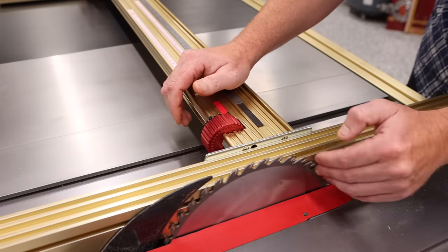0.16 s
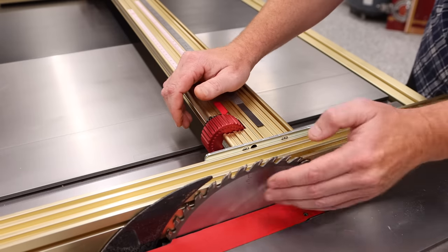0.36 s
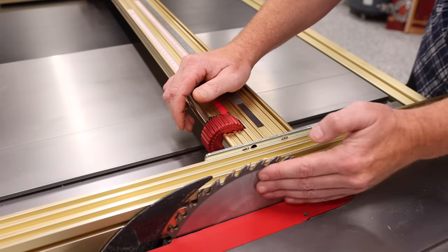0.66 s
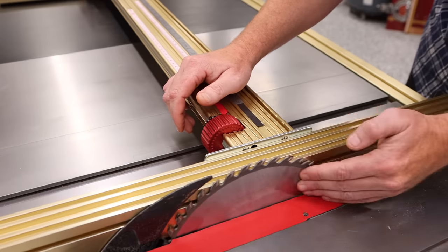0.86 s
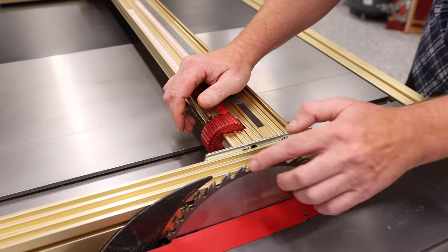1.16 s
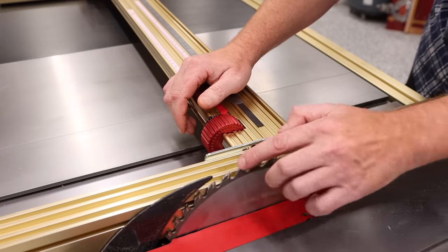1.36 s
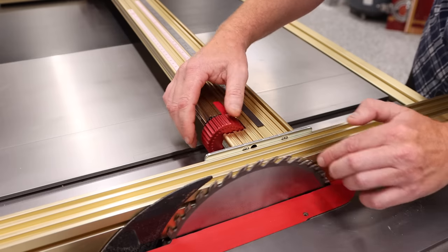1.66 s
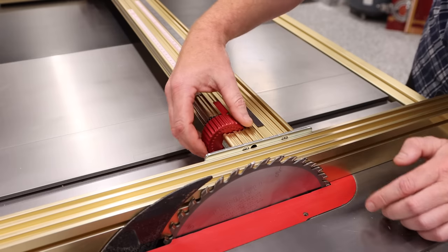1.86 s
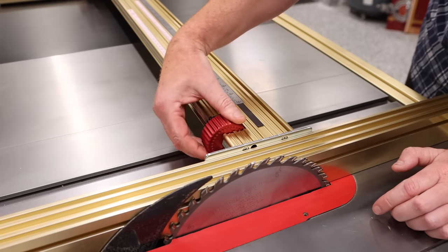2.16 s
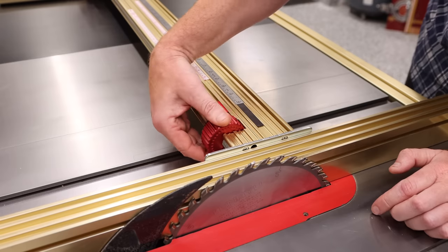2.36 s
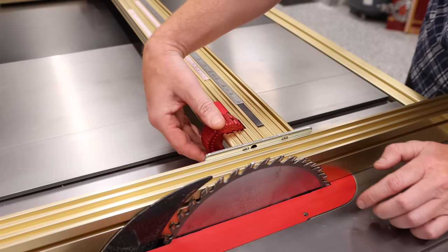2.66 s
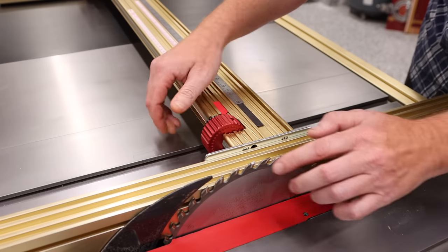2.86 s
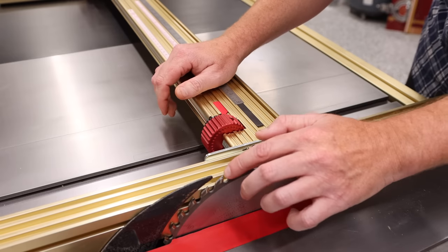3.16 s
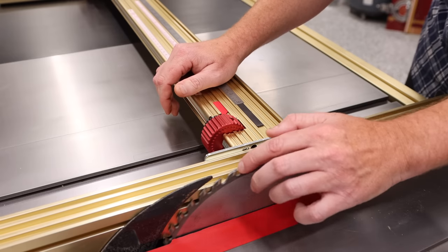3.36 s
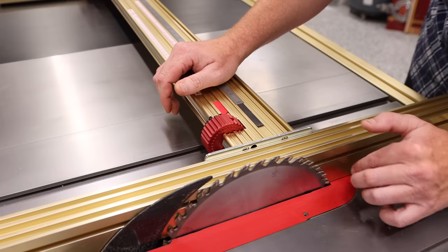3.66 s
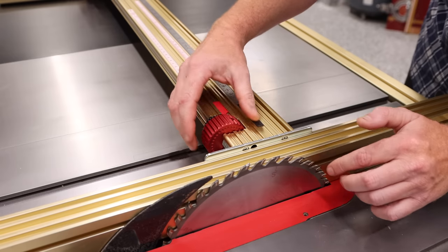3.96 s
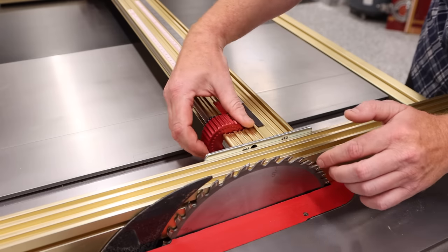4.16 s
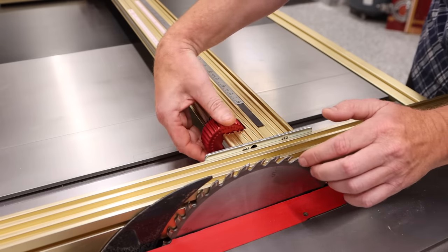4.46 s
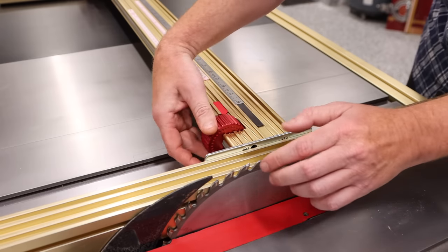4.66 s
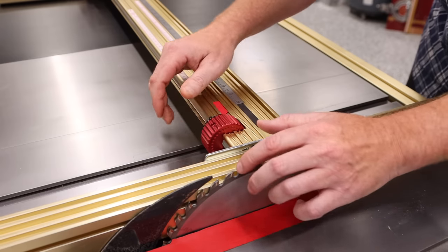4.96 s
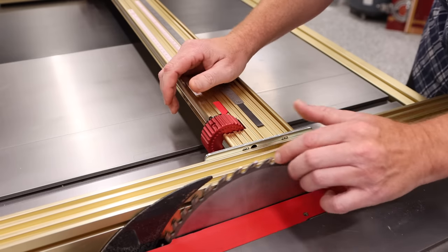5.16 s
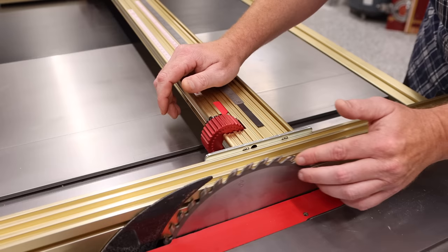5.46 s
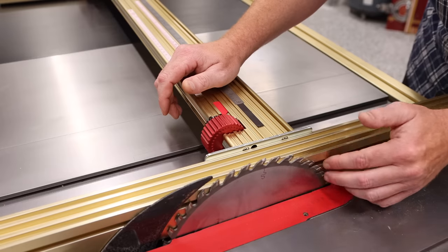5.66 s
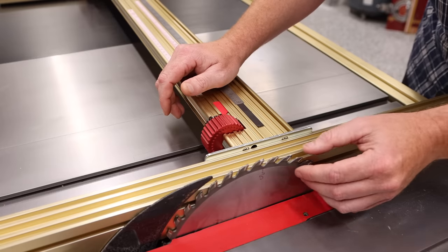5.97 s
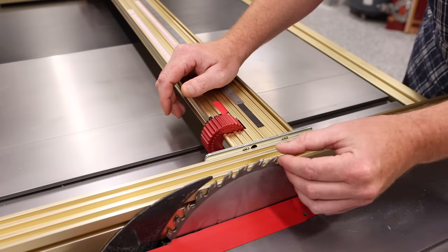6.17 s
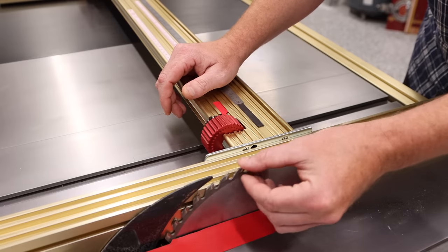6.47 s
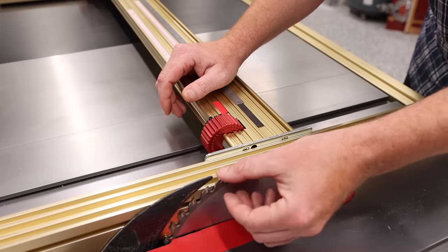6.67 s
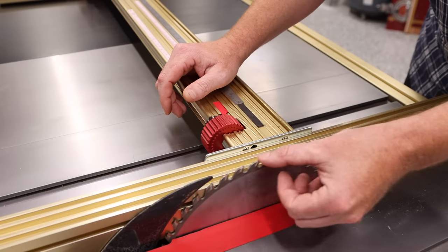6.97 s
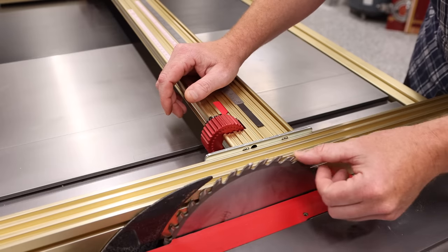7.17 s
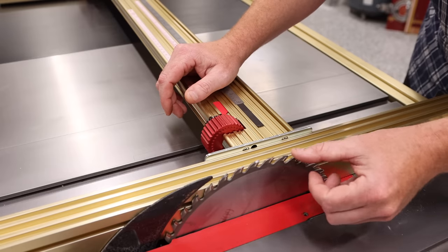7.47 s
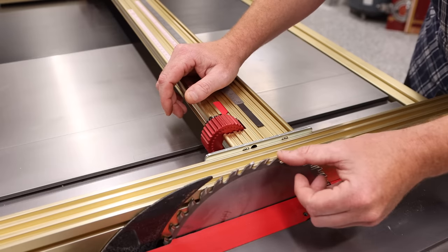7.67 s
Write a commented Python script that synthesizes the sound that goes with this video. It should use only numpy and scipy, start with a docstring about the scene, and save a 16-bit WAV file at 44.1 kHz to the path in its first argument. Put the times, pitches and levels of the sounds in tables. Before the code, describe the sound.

A close microphone picks up hands on a table saw that is switched off. Quiet taps and dry brushing lead to a rapid run of five hard, metallic knob clicks, a single knock, a few light ticks, and another five-click run. Afterwards carbide teeth catch and scrape on hollow aluminium, with short hollow, ringing squeaks in uneven groups. The room is almost echo-free, with slight low background noise and hiss.

```python
"""Fingertips tap and brush an aluminium saw fence: short resonant ticks and shaped friction noise.
A knurled knob is then turned through five detents, twice: noise snaps, decaying modes and screw friction.
After more touches, a saw blade is rocked by hand: its teeth scrape the fence, uneven noise feeding resonances.
Throughout, coloured noise gives a low background rumble, rising with the handling sounds, and a faint hiss."""
import sys
import numpy as np
from scipy import signal
from scipy.fft import rfft, irfft
from scipy.io import wavfile
from scipy.ndimage import uniform_filter1d

SR = 44100
rng = np.random.default_rng(int(sys.argv[2]) if len(sys.argv) > 2 else 0)


def generate_wav(sig):
    """Save sig (samples, or channels by samples) to the path in sys.argv[1] as 16-bit PCM at SR."""
    pcm = np.round(np.clip(np.atleast_2d(sig).T, -1, 1) * 32767).astype(np.int16)
    wavfile.write(sys.argv[1], SR, pcm)


N = 344807


def undb(db):
    """Amplitude ratio: decibels to gain."""
    return 10 ** (np.asarray(db) / 20)


def unit(x):
    """Power normalisation: scale to rms 1."""
    return x / np.sqrt(np.mean(x ** 2))


def colour(x, points):
    """Spectral shaping: (Hz, dB) points joined on a log frequency axis; rms 1."""
    hz, db = np.transpose(points)
    bins_hz = np.arange(len(x) // 2 + 1) * SR / len(x)
    log_f = np.log(bins_hz + 0.0014)  # the offset avoids log(0)
    gain = undb(np.interp(log_f, np.log(hz), db, left=-90, right=-90))
    return unit(irfft(rfft(x) * gain, len(x)))


def resonate(x, hz, width):
    """Simple resonance: a two-pole filter with gain 1 at its centre."""
    return signal.lfilter(*signal.iirpeak(hz, hz / width, fs=SR), x)


def band(x, hz, width):
    """Cascaded resonance: two equal resonators in series; rms 1."""
    return unit(resonate(resonate(x, hz, width), hz, width))


def walk(rate):
    """Random modulation: levels held 1 / rate s and slewed twice; spread near 1."""
    k = int(SR / rate)
    steps = np.repeat(rng.standard_normal(N // k + 1), k)
    return 0.89 * uniform_filter1d(uniform_filter1d(steps, k), k)[:N]


def decay(t, rise, t60):
    """Exponential damping: a quick build-up, then a fall of 60 dB per t60."""
    return (1 - np.exp(-t / rise)) * np.exp(-np.log(1000) * t / t60)


def add(out, s, x):
    """Superposition: mix x into out from time s."""
    i = int(s * SR)
    out[i:i + len(x)] += x[:len(out) - i]


# detent clicks: (time [s], level [dB], low ring in the rail [dB], top [dB])
DETENTS = [(2.248, -22.5, 2, -4.5), (2.314, -23, -3.5, -4), (2.38, -22, -5.5, 6.8), (2.45, -24, -1.3, 0),
           (2.521, -22, -7.5, 4), (4.34, -22.5, -2, -0.1), (4.402, -21.5, -9, -0.5), (4.472, -22, -5, 6),
           (4.557, -29.5, 0.5, -8), (4.631, -22.5, -4, -11)]
# modes of the knob: (frequency [Hz], level [dB], t60 before the 65 ms cap [s])
KNOB_MODES = [(1198, -12, 0.092), (1458, -4.5, .05), (2074, -7.5, 0.046), (2263, -9.5, 0.068),
              (3270, -9.5, .045), (3693, 4, 0.037), (4160, -5.5, 0.064), (5000, -3, 0.025),
              (5050, -6.5, .045), (5330, 0.5, 0.054), (5400, -4, 0.032), (6780, -3, 0.039),
              (8000, 0.5, 0.023)]
# spectrum of the snap: (frequency [Hz], density [dB per Hz])
SNAP_SPECTRUM = [(18, -51), (30, -19), (858, -21.5), (1180, -13.5), (1800, -13), (2220, -8.5), (3660, -1.5),
                 (4650, -4), (5300, 0), (13000, -17.5), (14500, -14), (16500, -37.5)]
KNOB_RING_DB = 2  # lift of the knob's modes near 2.2 kHz


def detents():
    """Impact excitation: a ball drops into a groove, giving a snap, the knob's modes and a thud in the rail."""
    out, t = np.zeros(N), np.arange(8192) / SR
    hz, mode_db, t60 = np.transpose(KNOB_MODES)[:, :, None]
    t60 = np.minimum(t60, .065)  # no mode rings longer than 65 ms
    high_pass = signal.butter(2, 7000, "high", fs=SR, output="sos")
    low_pass = signal.butter(2, 1600, fs=SR, output="sos")
    for s, db, low_db, top_db in DETENTS:
        luck_db, detune, phase = rng.standard_normal((3, len(KNOB_MODES), 1))
        # each groove strikes the modes in other proportions
        mode_gain = undb(mode_db + 4 * luck_db + low_db * (hz < 1600)
                         + KNOB_RING_DB * (abs(hz - 2200) < 500))
        tones = np.sin(2 * np.pi * (hz * (1 + 0.0046 * detune) * t + phase))
        rings = np.sum(mode_gain * tones * decay(t, 0.00092, t60), axis=0)
        snap = colour(rng.standard_normal(len(t)), SNAP_SPECTRUM)
        top = signal.sosfilt(high_pass, snap)
        thud = signal.sosfilt(low_pass, snap)
        click = snap * (decay(t, 0.0033, 0.038) + undb(-16.0) * decay(t, 0.01, 0.094))
        click += undb(top_db) * top * decay(t, 0.00052, 0.01)
        click += undb(low_db) * thud * decay(t, 0.0059, 0.11)
        click += undb(-9.0) * rings
        add(out, s, undb(db) * click)
    return out


# strokes of the teeth: (time [s], rise [s], hold [s], level [dB], deep mode [Hz], deep mode level [dB],
# blade ring [dB])
SCRAPES = [(5.501, .0032, 0.026, -37.5, 563, 4, -6), (5.542, 0.022, 0.031, -39.5, 850, 10, 9),
           (5.606, 0.022, 0.037, -39.5, 352, 14.5, 14), (5.711, 0.017, 0.057, -58, 363, 3, 12),
           (6.361, 0.031, 0.038, -47, 566.5, 19.5, 12), (6.514, 0.0047, .012, -42, 577, -15, 16),
           (6.588, 0.029, 0.021, -46, 350, 15.5, 23), (6.937, 0.017, 0.016, -43, 830, 2, 20),
           (7.025, 0.011, 0.002, -40, 840, -10, 16), (7.102, 0.019, 0.0051, -39, 340, 6.5, 12),
           (7.177, 0.0055, 0.012, -47.5, 360, -4, 3), (7.33, 0.038, 0.0033, -64, 316, 17, 8),
           (7.681, .028, 0.033, -60.5, 364, 1, 11), (7.742, .082, .05, -45.5, 355, 15.5, 17)]
# modes of the fence, with the blade's at 2.3-2.7 kHz; taps() rings them too:
# (frequency [Hz], nominal width [Hz], level [dB])
FENCE_MODES = [(1275, 190, -15.5), (1522, 14.3, -8), (1995, 36, -2.5), (2163, 7.3, -10), (2486, 5.9, -0.5),
               (2995, 28, -3), (3648, 75, 5.5), (3885, 120, -5.5), (4230, 33, 0), (4990, 13, -8),
               (5660, 29, -14), (5614, 32, -13), (7430, 53, -10), (8170, 15, -26.5), (9460, 27, -19.5),
               (10800, 54, -20), (13870, 69, -14.5), (15500, 69, -30)]
# spectrum of the grit under the teeth: (frequency [Hz], density [dB per Hz])
GRIT_SPECTRUM = [(240, -20), (400, -14.5), (1050, -20.5), (1210, -13.5), (1700, -15.5), (3700, -7),
                 (6900, -28), (7820, -10), (12700, -48), (14800, -22), (16500, -72)]
FADE_T60_S, FADE_PER_LENGTH = .06, 1.64  # longer strokes let go more slowly
BRIGHT_DB, BLADE_WIDTH_HZ = 10.5, 32  # lift of bright fence modes; the blade rings more cleanly
MIDDLE_DB, MIDDLE_PER_DEEP = 7.5, 0.83  # modes under 1.7 kHz grow with the deep one
HAND_DAMPING = .018  # a hand on the blade: least width of the other modes, as a share of frequency


def scrapes():
    """Friction excitation: carbide teeth slip unevenly on aluminium, ringing the hollow fence and blade."""
    out, t = np.zeros(N), np.arange(16384) / SR
    chatter = undb(walk(900) + 2.8 * walk(90))
    wander = undb(0.83 * walk(40))  # the contact point creeps during a stroke
    for s, rise, hold, db, deep_hz, deep_db, blade_db in SCRAPES:
        fade_t60 = FADE_T60_S + FADE_PER_LENGTH * (rise + hold)
        fade = np.exp(-np.log(1000) * np.clip(t - rise - hold, 0, None) / fade_t60)
        push = np.clip(t / rise, 0, 1) ** 0.67 * fade
        slips = rng.standard_normal(len(t)) * np.resize(chatter[int(s * SR):], len(t))
        stroke = undb(-7) * push * colour(slips, GRIT_SPECTRUM)
        stroke += undb(deep_db) * resonate(slips * push, deep_hz, 15.5)
        # each tooth meets the fence elsewhere, so the modes are fed in other proportions
        for hz, width, mode_db in FENCE_MODES:
            luck_db, place = rng.standard_normal(2) * [1.8, 1]
            width = max(width, HAND_DAMPING * hz)
            share_db = BRIGHT_DB
            if hz < 1700:
                share_db = MIDDLE_DB + MIDDLE_PER_DEEP * deep_db
            elif 2300 < hz < 2700:
                share_db, width = blade_db, BLADE_WIDTH_HZ
            creep = np.roll(wander, int(9999 * place))[:len(t)]
            ring = resonate(slips * push * creep, hz * (1 + 0.0037 * place), width)
            stroke += undb(mode_db + share_db + luck_db) * ring
        add(out, s, undb(db) * stroke)
    return out


# finger and tooth taps, hand thumps: (time [s], level [dB], centre [Hz], nominal t60 [s])
TAPS = [(.115, -57, 3700, 0.022), (0.116, -41.5, 292, 0.041), (0.193, -58, 1150, 0.015),
        (0.222, -65, 3760, 0.12), (.54, -61.5, 684, 0.024), (0.85, -40, 143, 0.097),
        (.855, -55, 2700, 0.015), (1.185, -60, 487, 0.04), (1.659, -51.5, 650, 0.029),
        (1.724, -58, 3100, 0.075), (1.734, -39.5, 130, 0.13), (1.743, -58.5, 3440, 0.097),
        (2.62, -49.5, 870, 0.0087), (2.973, -29.5, 2030, 0.0053), (2.978, -47, 394, 0.051),
        (3.655, -50.5, 4900, 0.011), (3.713, -50.5, 4000, 0.099), (3.712, -45.5, 2400, 0.078),
        (3.72, -52, 438, 0.056), (5.254, -63, 6580, 0.014), (5.352, -62, 3120, 0.033),
        (5.502, -45.5, 1350, 0.018), (7.268, -69.5, 3680, 0.061)]


def taps():
    """Forced resonance: a short tick in one band also rings the fence; low ones push softly."""
    out, t = np.zeros(N), np.arange(8192) / SR
    for s, db, hz, t60 in TAPS:
        tick = band(rng.standard_normal(len(t)), hz, 0.88 * hz)
        # lower bands build up more slowly
        tick *= decay(t, 0.86 / hz, 0.58 * t60) + undb(-11.5) * decay(t, 6 / hz, t60)
        ring = sum(resonate(tick, 1. * mode_hz, 3.3 * width) for mode_hz, width, _ in FENCE_MODES)
        add(out, s, undb(db) * (tick + undb(3.0) * ring))
    return out


def slide(t, length):
    """Sliding envelope: friction swells, holds and stops rather abruptly."""
    swell = np.clip(t / (.012 + .12 * length), 0, 1)
    return swell * np.clip((length - t) / 0.055 + .5, 0, 1)


def friction_flutter():
    """Amplitude modulation: slow and fast random unevenness of sliding contact."""
    return undb(2.7 * walk(28) + walk(220))


# rubbing of the knob's screw: (time [s], length [s], level [dB])
TURNS = [(2.217, 0.422, -59), (4.309, 0.412, -62)]
# spectrum of the screw: (frequency [Hz], density [dB per Hz])
SCREW_SPECTRUM = [(530, -33), (900, -3), (1870, -8.5), (2240, -7), (3310, -19.5), (5070, -0.5),
                  (7120, -6.5), (8150, -4), (12900, -16), (14800, -6), (15900, -18), (16500, -38)]


def turns():
    """Sliding friction: the knob's screw rubs while it turns, a coloured noise."""
    out, t = np.zeros(N), np.arange(24576) / SR
    for s, length, db in TURNS:
        rub = colour(rng.standard_normal(len(t)), SCREW_SPECTRUM)
        add(out, s, undb(db) * rub * slide(t, length))
    return out * friction_flutter()


# skin brushing metal, and at 4.314 s a short creak as the knob starts to turn:
# (time [s], length [s], level [dB], brightest band [Hz])
BRUSHES = [(0.07, 0.09, -76, 4240), (0.172, .088, -70.5, 3970), (0.477, 0.071, -74.5, 5800),
           (0.7, 0.22, -72.5, 5850), (0.908, 0.1, -69.5, 5770), (1.083, 0.15, -80, 5770),
           (1.423, 0.034, -79.5, 6040), (1.544, 0.059, -80, 5950), (1.648, 0.15, -72, 5970),
           (1.99, 0.065, -76, 6000), (2.106, 0.055, -73.5, 5960), (2.626, 0.14, -63, 5140),
           (2.939, .17, -74.5, 4730), (3.639, 0.12, -65.5, 4020), (3.82, 0.15, -70.5, 8500),
           (4.155, 0.065, -80, 5060), (4.314, .03, -55.5, 1705), (4.716, 0.13, -63, 5300),
           (4.854, 0.11, -74, 5350), (5.315, 0.077, -77, 5030)]
# spectrum of the skin: (frequency [Hz], density [dB per Hz])
SKIN_SPECTRUM = [(710, -52), (1200, -5), (1820, -3), (4100, 0), (8000, -3), (13000, -15.5), (14800, -8.5),
                 (15800, -21), (16500, -17)]
BRUSH_BAND_DB, BAND_PER_LEVEL = -8.5, 0.52  # band at -77 dB and under; its rise per dB above that
PALM_HZ, PALM_DB = 333, -6.5  # soft low body of a sliding hand


def brushes():
    """Sliding friction: skin strokes and one creak are soft noise; the bright band grows with level."""
    out, t = np.zeros(N), np.arange(24576) / SR
    for s, length, db, hz in BRUSHES:
        noise = rng.standard_normal(len(t))
        band_db = BRUSH_BAND_DB + BAND_PER_LEVEL * max(db + 77, 0)
        hiss = colour(noise, SKIN_SPECTRUM)
        hiss += undb(band_db) * band(noise, hz, 0.58 * hz)
        hiss += undb(PALM_DB) * band(noise, PALM_HZ, PALM_HZ)
        add(out, s, undb(db) * hiss * slide(t, length))
    return out * friction_flutter()


def room(x, t60=0.14, wet_db=-32):
    """Diffuse reverberation: a faint noise tail from the shop walls, by convolution."""
    t = np.arange(int(.4 * SR)) / SR
    tail = rng.standard_normal(len(t)) * decay(t, .01, t60)
    tail /= np.sqrt(np.sum(tail ** 2))
    return x + undb(wet_db) * signal.fftconvolve(x, tail)[:N]


# spectrum of the rumble: (frequency [Hz], density [dB per Hz])
RUMBLE_SPECTRUM = [(35, -43.5), (60, -5.5), (92, -17.5), (124, -4), (207, -4), (345, -9), (404, -4),
                   (655, -12.5), (777, -13.5), (1800, -26), (2340, -53), (3960, -120)]
RUMBLE_DB, RUMBLE_DB_PER_S = -74, -0.5634  # in silence at the start; it sinks slowly
SWELL_DB, SWELL_KNEE_DB, SWELL_S = 9, -70.5, 0.05  # most it rises, half-way handling level, smoothing


def background_rumble(handling):
    """Level-dependent gain: low background noise, wavering by band, let through more while the hands sound."""
    noise = colour(rng.standard_normal(N), RUMBLE_SPECTRUM)
    below, rumble = 0, 0
    for edge_hz in (45, 90, 180, 360, 720, 5000):
        upto = signal.sosfiltfilt(signal.butter(2, edge_hz, fs=SR, output="sos"), noise)
        rumble = rumble + (upto - below) * undb(2.5 * walk(12))
        below = upto
    loudness = uniform_filter1d(np.abs(handling), 441)
    opening = loudness / (loudness + undb(SWELL_KNEE_DB))  # 0 in silence, towards 1 when loud
    opening = uniform_filter1d(opening, int(SWELL_S * SR))
    return rumble * undb(RUMBLE_DB + RUMBLE_DB_PER_S * np.arange(N) / SR + SWELL_DB * opening)


# spectrum of the steady bass: (frequency [Hz], density [dB per Hz])
DRONE_SPECTRUM = [(12, -3.5), (25, 7.5), (60, -12.5), (125, -4.5), (170, -31.5)]
DRONE_DB = -80.5  # centre of its wavering level


def drone():
    """Low-frequency noise: a lasting bass whose level wavers gently."""
    return undb(DRONE_DB + 2.5 * walk(5.9)) * colour(rng.standard_normal(N), DRONE_SPECTRUM)


# spectrum of the hiss: (frequency [Hz], density [dB per Hz])
HISS_SPECTRUM = [(700, -27.5), (1000, -7.5), (1500, -6), (2100, -12), (3400, -16), (4200, -12.5),
                 (6300, -7.5), (8500, -14), (12800, -18.5), (14800, -11.5), (16500, -19)]
HISS_DB, HISS_DB_PER_S = -84, -0.2  # even part at the start; slow fall


def background_hiss():
    """Modulated noise: faint coloured background hiss, with a band near 6.5 kHz wavering at random."""
    hiss = colour(rng.standard_normal(N), HISS_SPECTRUM)
    flicker = undb(-5.5 + 6.4 * walk(4.9)) * resonate(hiss, 6500, 3000)
    level_db = HISS_DB + HISS_DB_PER_S * np.arange(N) / SR + 1.1 * walk(1.8)
    return undb(level_db) * (hiss + flicker)


def scene():
    """Superposition: all sources sum at one microphone."""
    handling = room(detents() + scrapes() + taps()) + turns() + brushes()
    return (handling + background_rumble(handling) + drone() + background_hiss())[None]


def record(dry):
    """Band limiting: the recorder cuts the top with a steep elliptic low-pass at 16.5 kHz."""
    return signal.sosfilt(signal.ellip(10, .2, 80, 16500, fs=SR, output="sos"), dry)


dry = scene()
out = record(dry)
generate_wav(out)
```